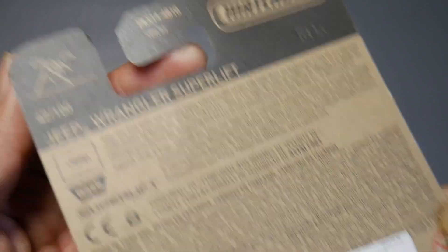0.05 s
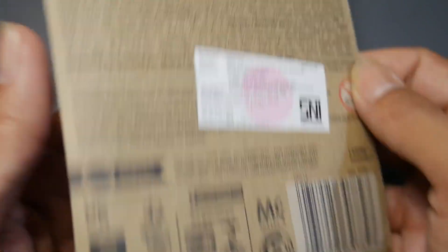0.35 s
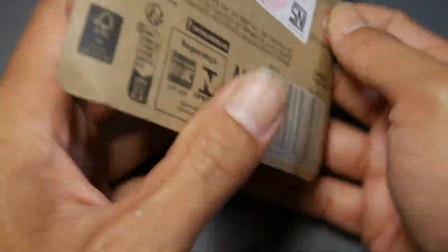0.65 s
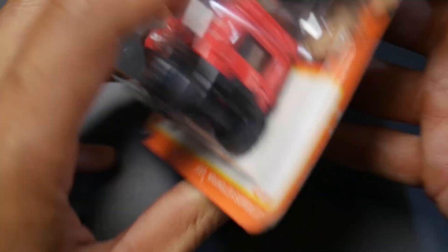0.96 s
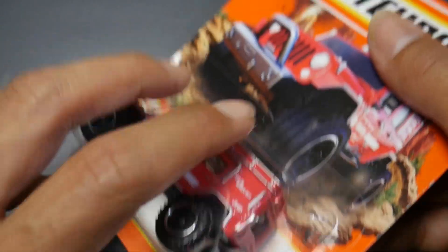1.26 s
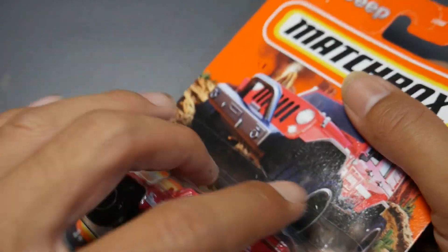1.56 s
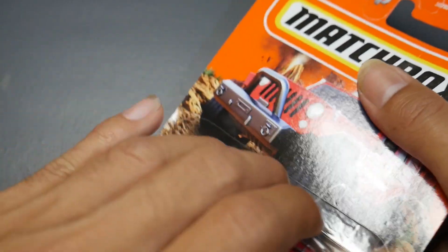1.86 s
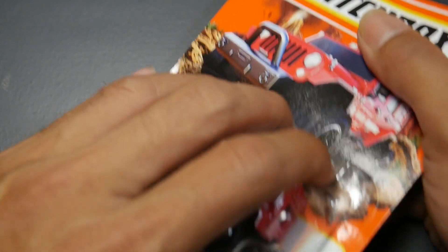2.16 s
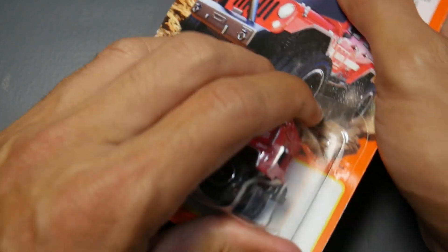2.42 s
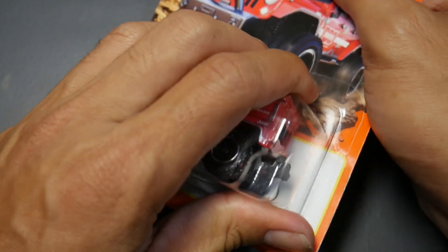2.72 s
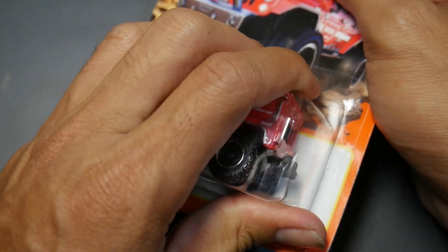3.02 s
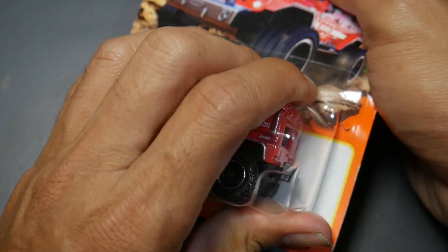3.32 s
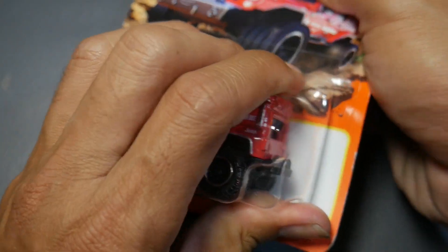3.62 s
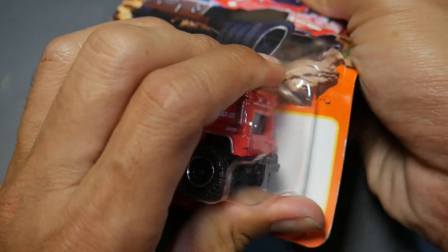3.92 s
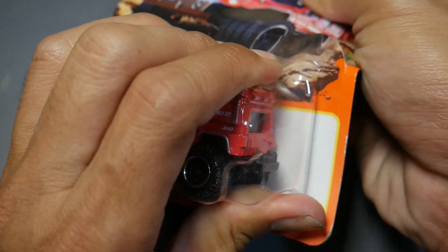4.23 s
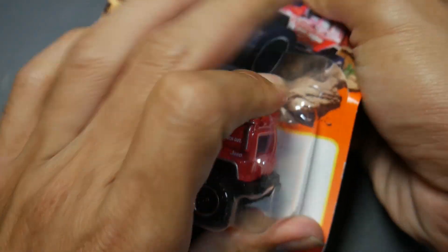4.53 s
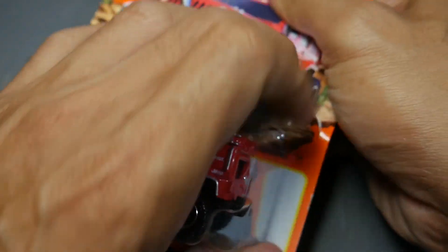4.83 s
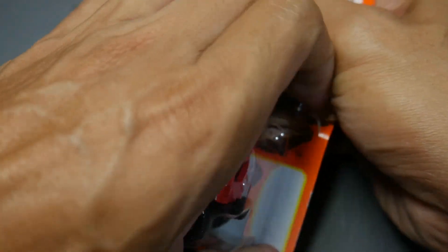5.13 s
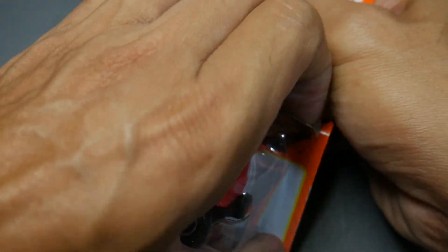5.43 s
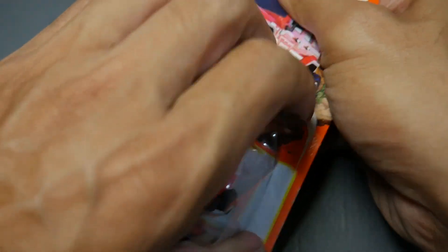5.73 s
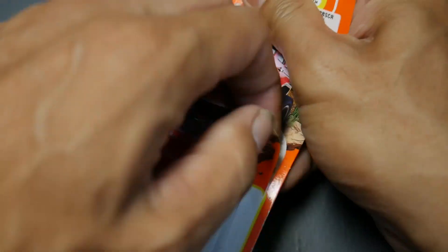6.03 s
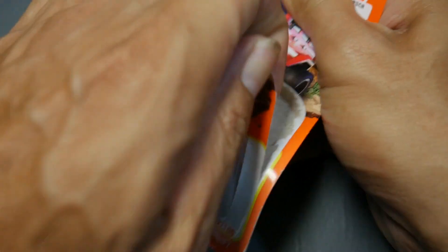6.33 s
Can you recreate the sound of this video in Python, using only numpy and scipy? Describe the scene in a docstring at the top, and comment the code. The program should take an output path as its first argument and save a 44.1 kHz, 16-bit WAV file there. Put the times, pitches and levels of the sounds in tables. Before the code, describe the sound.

A fan hums steadily in a small room. Close to the microphone and slightly left, hands turn over a carded plastic blister pack, with light clicks, rubbing and dull card thuds around 0.6 to 0.9 seconds. Fingers slide over it from 1 to 2.5 seconds, with small crinkles and a brief squeak near 1.4. After a quieter moment, the glued seam creaks and the thin plastic ticks from about 3.3 to 4.3 seconds, with soft bumps near 4. The bubble gives a hollow pop at 4.6, followed by an airy swish of card and, at 5 seconds, a sharp crack, the loudest sound. From 5.3 the cardboard starts peeling in louder, rasping tears, with plastic snaps near 5.5, 5.7, 5.9 and 6.3, and a last scraping tear until about 6.5 seconds. Each sound has a short room echo.

```python
"""A small room with a fan humming, the camera's microphone close to a pair of hands, a little left of centre.
They turn over a carded blister pack, pick at its edge and start to peel the card off the bubble.
Fingers rub and squeak on card and plastic, the thin shell ticks and buckles with sharp snaps,
the card thuds and swishes, and glued fibres creak and tear. Desk and walls answer each sound."""
import sys
import numpy as np
from scipy import signal
from scipy.fft import rfft, irfft, next_fast_len
from scipy.io import wavfile
from scipy.ndimage import uniform_filter1d, minimum_filter1d, map_coordinates

SR = 44100
rng = np.random.default_rng(int(sys.argv[2]) if len(sys.argv) > 2 else 0)


def unload_wav(signal):
    """Save mono or channel-first audio to the path in sys.argv[1] as 16-bit WAV at rate SR, clipped to [-1, 1]."""
    wavfile.write(
        sys.argv[1],
        SR,
        np.round(np.clip(np.atleast_2d(signal).T, -1, 1) * 32767).astype(np.int16),
    )


N = 285327

# The fan's rush of air: frequency_hz, density_db
FAN_AIR_SPECTRUM = [(15, -70), (25, -30), (164, -8), (281, -4), (340, -6), (389, -5), (871, -11.5),
                    (945, -11.5), (1020, -15.5), (1380, -16), (1660, -20.5), (2360, -32), (2850, -25),
                    (6920, -36), (15500, -42)]
# Its motor's harmonics: pitch_hz, level_db
MOTOR_HUM = [(333.8, -55.5), (667.5, -66.5), (1001, -66.5)]
# Its narrow whistles: pitch_hz, width_hz, level_db
FAN_WHISTLES = [(2253, 4.6, -70.5), (2340, 290, -63), (2377, 3.9, -68.5)]
# A finger slides over the pack or peels the card: start_s, fastest_s, end_s, rub_gain_db, hiss_gain_db
STROKES = [(-0.02, 0.234, 0.4, -58.5, -60.5), (0.615, 0.737, 0.92, -48.5, -58),
           (0.998, 1.028, 1.09, -52.5, -60), (1.126, 1.214, 1.26, -51.5, -60.5),
           (1.236, 1.32, 1.48, -46, -61), (1.49, 1.532, 1.69, -52.5, -67), (1.594, 1.81, 2.4, -62, -69.5),
           (1.9, 2.195, 2.22, -50, -56), (2.12, 2.276, 2.56, -50.5, -62.5), (2.674, 2.837, 3.09, -55, -86),
           (3.318, 3.37, 3.42, -52, -68), (3.45, 3.59, 3.95, -53.5, -73), (3.762, 3.904, 3.9, -58, -62.5),
           (3.926, 4.03, 4.24, -50.5, -51), (4.396, 4.501, 4.57, -46, -55.5),
           (4.575, 4.658, 4.82, -43.5, -56.5), (4.733, 4.898, 5.1, -51, -52), (5.204, 5.32, 5.42, -46, -51),
           (5.459, 5.5, 5.57, -50, -42.5), (5.497, 5.683, 5.78, -39.5, -41), (5.674, 5.75, 5.81, -39, -56),
           (5.808, 5.9, 6.12, -40.5, -52.5), (6.0, 6.108, 6.7, -46, -57), (6.187, 6.397, 6.45, -47, -39.5),
           (6.345, 6.47, 6.5, -35.5, -54)]
# The pack's body under rubbing skin: frequency_hz, density_db
RUB_SPECTRUM = [(60, -47), (150, -4), (300, -23), (550, 7), (770, 7.5), (950, 2.5), (1250, 5), (1600, 3),
                (2300, -2), (2900, -6.5), (4500, -10.5), (8000, -39)]
# Card fibres scraped and torn: frequency_hz, density_db
FIBRE_SPECTRUM = [(1500, 2), (3000, 3.5), (3800, 1), (5200, 3.5), (6500, 4.5), (8000, -1.5), (9800, 1),
                  (12000, -6.5), (15500, -15)]
# The plastic shell's resonances: pitch_hz, gain_db, t60_s
SHELL_MODES = [(1100, 13, 0.0085), (1311, 0.5, 0.032), (1330, -4, 0.0058), (1680, -7.5, 0.015),
               (1938, -4, 0.027), (2102, 0, 0.018), (2376, -5.5, 0.026), (2710, -5, 0.014),
               (3650, 1.5, 0.0077)]
# The bubble buckles or a nail slips off its edge:
# start_s, panel_pitch_hz, panel_level_db, crease_pitch_hz, shell_gain_db, crack_gain_db, slip_length_s
SNAPS = [(0.1371, 730, -50, 1580, -60, -64, .001), (0.2156, 646, -46.5, 1290, -53.5, -62, 0.0028),
         (0.5719, 637, -39, 1620, -42.5, -53.5, .0012), (0.654, 650, -38.5, 2360, -44, -51, .0032),
         (0.67, 530, -50, 1860, -51, -60, .001), (0.7162, 623, -30, 1870, -43, -40, .006),
         (0.789, 620, -36.5, 2100, -39, -48.5, 0.005), (0.928, 710, -47, 1260, -51, -58, .001),
         (1.0454, 610, -49, 2500, -41.5, -50.5, .001), (1.189, 770, -52, 1820, -53, -55, .001),
         (1.214, 720, -51, 2430, -49, -64, .001), (1.5285, 780, -44.5, 1260, -48, -53, 0.0021),
         (1.9868, 790, -47, 1270, -51, -61, .0056), (2.091, 810, -47, 1370, -44, -53.5, 0.0012),
         (2.1712, 587, -44.5, 2130, -41.5, -53, .001), (2.261, 830, -47.5, 1500, -48, -54.5, .0072),
         (3.5587, 394, -49, 1390, -48.5, -57, .001), (3.5913, 890, -53, 1380, -45, -54, .001),
         (3.6156, 680, -48, 1480, -42.5, -50.5, .001), (3.6409, 930, -51, 1330, -46, -49, .001),
         (3.864, 905, -50, 1230, -51.5, -61, 0.0027), (3.957, 840, -46, 1900, -50, -46, .0045),
         (4.013, 380, -50, 3070, -49, -44.5, .001), (4.0584, 920, -54, 1260, -40.5, -47, .001),
         (4.1549, 910, -51, 1100, -51.5, -71, .0016), (4.2565, 904, -45.5, 1120, -49.5, -55, .001),
         (4.6015, 538, -18.5, 1420, -36, -53, 0.00074), (4.6656, 458, -40.5, 1240, -42, -48, .001),
         (4.7152, 670, -46, 1320, -46, -50.5, .001), (5.0431, 758, -20, 1422, -13, -16, 0.00247),
         (5.281, 820, -45, 1600, -43, -49, 0.0052), (5.3033, 412, -43, 1340, -42.5, -62, .0056),
         (5.3279, 480, -35, 1270, -43, -49.5, .001), (5.4675, 774, -35.5, 1730, -32.5, -33.5, .0055),
         (5.478, 643, -30.5, 1400, -31, -37.5, 0.005), (5.7081, 790, -32.5, 1690, -28.5, -48, .0062),
         (5.732, 644, -26, 1670, -21, -27.5, .001), (5.7866, 714, -35.5, 1810, -58, -64, .001),
         (5.9192, 720, -61, 1380, -38, -60, .001), (5.9291, 730, -20, 1160, -39, -53, .001),
         (5.9882, 720, -33.5, 1570, -37, -49, 0.00199), (5.9951, 755, -52, 1540, -37.5, -45, .007),
         (6.334, 786, -32.5, 1490, -27, -57, .001)]
# The crack at a crease: frequency_hz, density_db
CRACK_SPECTRUM = [(300, -48), (1500, -39), (2500, 5), (3000, 2.5), (3750, 2.5), (4400, -1.5), (5500, -1.5),
                  (7000, -4), (8000, -10), (9600, -12), (11500, -18), (15500, -38)]
# The card is bumped and flexes in the hands: start_s, gain_db
BUMPS = [(0.216, -44), (0.575, -47), (0.718, -38), (0.792, -30), (0.831, -37), (3.972, -33.5),
         (4.06, -33.5), (4.137, -48), (6.103, -38)]
# Runs of ticks from the glued seam: start_s, tick_count, first_level_db, tilt_db_per_octave
CREAKS = [(0.856, 3, -49, -8.5), (1.964, 1, -52.5, -3.5), (2.979, 1, -56, -11), (3.217, 1, -50.5, -9),
          (3.327, 7, -52.5, -5), (3.498, 3, -57, -5.5), (4.129, 1, -48, 1), (4.197, 2, -53, 1),
          (4.293, 2, -52.5, 1.5), (4.838, 1, -50.5, 8), (5.287, 1, -46.5, 3), (5.398, 1, -49.5, -3.5),
          (5.479, 1, -38, -5), (5.524, 2, -45, 9), (5.651, 2, -41.5, 5)]
# Narrow fingertip squeaks and rasps, and one broad, airy swish of a sliding card edge:
# start_s, end_s, first_centre_hz, last_centre_hz, width_hz, level_db
FRICTION_BANDS = [(1.287, 1.341, 823, 770, 170, -46), (1.355, 1.411, 851, 1017, 260, -41.5),
                  (1.342, 1.417, 4090, 3640, 700, -56), (1.344, 1.404, 5840, 5550, 500, -61),
                  (1.342, 1.418, 7530, 7160, 900, -64), (2.789, 2.914, 784, 768, 400, -52),
                  (3.96, 4.085, 3920, 3090, 800, -51.5), (4.112, 4.237, 5160, 4600, 900, -61),
                  (4.444, 4.549, 1050, 1169, 500, -46.5), (4.767, 5.05, 10240, 10040, 4580, -57),
                  (5.459, 5.578, 6300, 6120, 900, -52), (5.829, 5.93, 627.2, 756, 220, -48),
                  (6.395, 6.447, 717, 800, 129, -43)]
# The room's decay: frequency_hz, t60_s
ROOM_DECAY = [(150, 0.67), (500, 0.29), (1400, 0.47), (4000, 0.39), (9000, 0.45), (15000, 0.62)]
# Nearby things that ring along: pitch_hz, gain_db, t60_s
NEARBY_RINGS = [(770, -33, 0.13), (1156, -26.5, 0.26), (2820, -48, 0.27)]
# How alike left and right are at the microphone, for fan, pack and room: frequency_hz, correlation
FAN_LIKENESS = [(30, 0.1), (120, 0.44), (330, 0.56), (1000, 0.63), (3000, 0.68), (10000, 0.23)]
PACK_LIKENESS = [(200, 0.85), (1500, 0.85), (5000, 0.88), (12000, 0.65)]
ROOM_LIKENESS = [(200, 0.86), (1200, 0.74), (4000, 0.71), (10000, 0.76)]


def amp(db):
    """Decibels to gain."""
    return 10 ** (np.asarray(db) / 20)


def unit(x):
    """x at rms 1."""
    return x / np.sqrt(np.mean(x ** 2) + 1e-20)


def unit_attack(x):
    """A short sound at rms 1 over its first 10 ms."""
    return x / np.sqrt(np.mean(x[..., :SR // 100] ** 2) + 1e-20)


def along(points, hz):
    """Read (frequency_hz, value) points on a log frequency axis."""
    frequencies, values = np.transpose(points)
    return np.interp(np.log(hz + 1), np.log(frequencies + 1), values)


def fade(t, t60_s):
    """Exponential decay, 60 dB down at t60_s."""
    return np.exp(-np.log(1000) * t / t60_s)


def rise(t, time_s):
    """Exponential onset from 0 towards 1."""
    return 1 - np.exp(-t / time_s)


def wobble(rate_hz):
    """A smooth random curve with rate_hz knots a second."""
    knots = rng.standard_normal(int(N * rate_hz / SR) + 4)
    return map_coordinates(knots, [np.arange(N) * rate_hz / SR])


def noise(samples):
    """Two unrelated channels of white noise."""
    return rng.standard_normal((2, samples))


def filtered(x, response):
    """x shaped by a gain that depends on frequency."""
    n = x.shape[-1]
    padded = next_fast_len(n + 4096)
    return irfft(rfft(x, padded) * response(np.fft.rfftfreq(padded, 1 / SR)), padded)[..., :n]


def coloured(x, spectrum):
    """x shaped by (frequency_hz, density_db) points, at rms 1."""
    return unit(filtered(x, lambda hz: amp(along(spectrum, hz))))


def stereo(pair, likeness):
    """Two unrelated signals become left and right of a given likeness."""
    angle = lambda hz: np.arccos(np.clip(along(likeness, hz), -1, 1)) / 2
    mid, side = filtered(pair, lambda hz: np.array([np.cos(angle(hz)), np.sin(angle(hz))]))
    return np.array([mid + side, mid - side])


def radiated(x, corner_hz):
    """A small surface radiates little below its corner frequency."""
    return signal.sosfilt(signal.butter(2, corner_hz, "highpass", fs=SR, output="sos"), x)


def add(track, start_s, sound):
    """Mix a sound into the track at start_s."""
    part = track[..., max(round(start_s * SR), 0):][..., :sound.shape[-1]]
    part += sound[..., :part.shape[-1]]


def fan(air_db=-53.5):
    """Behind the hands, a fan: steady air noise, a few narrow whistles and the motor's wavering hum."""
    t = np.arange(N) / SR
    air = amp(air_db) * coloured(noise(N), FAN_AIR_SPECTRUM)
    for pitch_hz, width_hz, db in FAN_WHISTLES:
        resonance = lambda hz: 1 / (1 + (2 * (hz - pitch_hz) / width_hz) ** 2)
        air += amp(db) * unit(filtered(noise(N), resonance))
    hum = sum(amp(db + wobble(3.46)) * np.sin(2 * np.pi * hz * t + 0.2 * wobble(6.38))
              for hz, db in MOTOR_HUM)
    return stereo(air, FAN_LIKENESS) + hum


def stroke_gains(grip_rub_db=-66, grip_hiss_db=-77):
    """Rub and hiss grow as each stroke speeds up; between strokes the grip never quite rests."""
    t = np.arange(N) / SR
    rub_power, hiss_power = np.full(N, amp(grip_rub_db) ** 2), np.full(N, amp(grip_hiss_db) ** 2)
    for start_s, fastest_s, end_s, rub_db, hiss_db in STROKES:
        moving = (t > start_s) & (t < end_s)
        speed = np.interp(t[moving], np.sort([start_s, fastest_s, end_s]), [0, 1, 0])
        rub_power[moving] += (amp(rub_db) * speed ** 0.88) ** 2
        hiss_power[moving] += (amp(hiss_db) * speed ** 0.98) ** 2
    return np.sqrt(rub_power), np.sqrt(hiss_power)


def friction(spectrum, slips_per_s, spread_db, rasp):
    """Tiny stick-slip releases of uneven size over a smooth rasp, at rms 1."""
    sizes = amp(spread_db * np.minimum(rng.exponential(size=N), 4))
    grains = unit((rng.random(N) < slips_per_s / SR) * sizes * noise(N))
    return unit(stereo(coloured(grains + rasp * noise(N), spectrum), PACK_LIKENESS))


def sliding(rub_gain, hiss_gain):
    """Skin rubs the pack and sounds its body; card fibres hiss as they are scraped and torn."""
    judder_db = 2.0 * wobble(55)  # the fingers catch and let go
    body = friction(RUB_SPECTRUM, slips_per_s=700, spread_db=2.0, rasp=0.97)
    tufts_db = -0.1 * wobble(170)  # the fibres part in small tufts
    fibres = friction(FIBRE_SPECTRUM, slips_per_s=3000, spread_db=3.1, rasp=0.6)
    return rub_gain * amp(judder_db - 1.5) * body + hiss_gain * amp(0.53 * judder_db + tufts_db) * fibres


def crinkles(rub_gain, flips_per_s=16, gain_db=-1.5, spread_db=3, mode_spread_db=6.5):
    """Small creases flip at random and ring the shell, as strongly as the finger rubs."""
    out, t = np.zeros(N), np.arange(SR // 20) / SR
    hz, db, t60_s = np.transpose(SHELL_MODES)[:, :, None]
    for k in range(int(flips_per_s * N / SR)):
        at = min(int((k + rng.random()) * SR / flips_per_s), N - 1)
        mode_gains = amp(db + mode_spread_db * rng.standard_normal(db.shape))
        ring = np.sum(mode_gains * np.sin(2 * np.pi * hz * t) * fade(t, t60_s), axis=0)
        strength = rub_gain[at] * amp(gain_db + spread_db * rng.uniform(-1.2, 1))
        add(out, at / SR, strength * unit_attack(ring))
    return radiated(out, corner_hz=696)


def tilted_fibres(db_per_octave):
    """The fibres' spectrum, brightened or dulled about 4 kHz."""
    return [(hz, db + db_per_octave * np.log2(hz / 4000)) for hz, db in FIBRE_SPECTRUM]


def fibre_pops(hiss_gain, pops_per_s=110, gain_db=-5, spread_db=5.0):
    """Single stronger fibres snap at random, as loud as the tear is fast."""
    t = np.arange(SR // 80) / SR
    breaks = (rng.random(N) < pops_per_s / SR) * amp(gain_db - spread_db * rng.exponential(size=N))
    bursts = signal.oaconvolve(breaks, unit_attack(fade(t, t60_s=0.012)))[:N]
    bright_hiss = coloured(noise(N), tilted_fibres(db_per_octave=2.0))
    return hiss_gain * bursts * stereo(bright_hiss, PACK_LIKENESS)


def rocking_panel(t, pitch_hz):
    """A panel of the bubble rocks in its two lowest modes, damped by the fingers."""
    modes = np.cos(2 * np.pi * pitch_hz * t) + 0.35 * np.cos(2 * np.pi * 0.794 * pitch_hz * t)
    damped = modes * fade(t, t60_s=0.017) * rise(t, 0.0019)
    return unit_attack(radiated(damped, corner_hz=0.25 * pitch_hz))


def crease_flip(t, pitch_hz, ring_db=-3):
    """A crease flips in about two cycles and rings the shell, most within an octave of its pitch."""
    flip = np.sin(2 * np.pi * pitch_hz * t) * t * fade(t, t60_s=0.0022)
    flip = radiated(flip, corner_hz=0.61 * pitch_hz)
    ring = np.zeros(len(t))
    for hz, db, t60_s in SHELL_MODES:
        strength = amp(db + rng.normal(0, 1)) / (1 + np.log2(hz / pitch_hz) ** 2)
        ring += strength * np.sin(2 * np.pi * hz * t + rng.normal(0, 0.5)) * fade(t, t60_s)
    ring = radiated(ring * rise(t, 0.0005), corner_hz=700)
    return unit_attack(unit_attack(flip) + amp(ring_db) * unit_attack(ring))


def catches(t, slip_s, gap_s=0.0014, size=0.65):
    """One release, then a catch roughly every gap_s while the slip lasts."""
    count = int(slip_s / gap_s)
    kicks = signal.unit_impulse(len(t))
    catch_s = (np.arange(count) + rng.uniform(0.6, 1.16, count)) * slip_s / max(count, 1)
    kicks[(catch_s * SR).astype(int)] += size * rng.choice([-1, 1], count)
    return kicks / np.linalg.norm(kicks)


def crack(t, t60_s, spectrum):
    """A bright burst of splitting fibres or creasing plastic."""
    burst = stereo(coloured(noise(len(t)), spectrum), PACK_LIKENESS)
    return unit_attack(burst * fade(t, t60_s) * rise(t, 0.000095))


def snaps():
    """A crease cracks, rings the shell and rocks a panel, towards the microphone and the walls."""
    to_mic, to_walls, t = np.zeros((2, N)), np.zeros(N), np.arange(SR // 16) / SR
    even_crack = unit_attack(coloured(signal.unit_impulse(len(t), SR // 1000), CRACK_SPECTRUM))
    for start_s, panel_hz, panel_db, crease_hz, shell_db, crack_db, slip_s in SNAPS:
        panel = amp(panel_db) * rocking_panel(t, panel_hz)
        shell = amp(shell_db + 1.86) * crease_flip(t, crease_hz)
        catching_shell = signal.fftconvolve(shell, catches(t, slip_s))[:len(t)]
        crack_gain = amp(crack_db - 0.1)
        close_crack = crack(t, 0.023 + 2 * slip_s, CRACK_SPECTRUM)
        add(to_mic, start_s, panel + catching_shell + crack_gain * close_crack)
        # summed over all directions, the catches blend and the crack's spectrum evens out
        add(to_walls, start_s, panel + shell + crack_gain * even_crack)
    return to_mic, to_walls


def card_bumps(gain_db=-6):
    """The stiff card gives a dull, low flutter when it is bumped."""
    out, t = np.zeros((2, N)), np.arange(SR // 4) / SR
    envelope = fade(t, t60_s=0.13) * rise(t, 0.0033)
    for start_s, db in BUMPS:
        thud = coloured(noise(len(t)), [(40, -31), (85, -2), (140, 2), (240, 3.5), (380, -3), (900, -34)])
        add(out, start_s, amp(db + gain_db) * stereo(thud, PACK_LIKENESS) * envelope)
    return out


def seam_creaks(gap_s=0.013, drop_db_per_tick=0.7, t60_s=0.023):
    """Glued fibres part in quick, weakening runs of ticks without moving the bubble."""
    out, t = np.zeros((2, N)), np.arange(SR // 20) / SR
    for start_s, count, first_db, tilt in CREAKS:
        spectrum = [(100, -40)] + tilted_fibres(tilt)
        for k in range(count):
            jitter = min(k, 1) * rng.normal(0, 0.08)
            tick = amp(first_db - drop_db_per_tick * k) * crack(t, t60_s, spectrum)
            add(out, start_s + gap_s * (k + jitter), tick)
    return out


def squeaks_and_swish():
    """Friction sounds in gliding bands: narrow fingertip squeaks and rasps, one airy swish of card."""
    out = np.zeros((2, N))
    for start_s, end_s, first_hz, last_hz, width_hz, db in FRICTION_BANDS:
        progress = np.linspace(0, 1, int((end_s - start_s) * SR))
        chatter = filtered(noise(SR // 2), lambda hz: 1 / (1 + (2 * hz / width_hz) ** 4))
        chatter = chatter[:, :len(progress)]
        phase = 2 * np.pi * np.cumsum(first_hz + (last_hz - first_hz) * progress) / SR
        band = unit(chatter[0] * np.cos(phase) + chatter[1] * np.sin(phase))
        add(out, start_s, amp(db) * np.sin(np.pi * progress) * band)
    return out


def room(x, tail_db=-6, delay_s=0.005):
    """The desk and walls answer after a few milliseconds, and nearby things ring along."""
    hz, frame_s, bands = signal.stft(noise(SR // 2), SR, nperseg=256)
    decay = fade(frame_s, along(ROOM_DECAY, hz)[:, None])
    tail = stereo(signal.istft(bands * decay, SR, nperseg=256)[1], ROOM_LIKENESS)
    tail *= amp(tail_db) / np.sqrt(np.sum(tail ** 2) / 2)
    t = np.arange(tail.shape[1]) / SR
    for pitch_hz, db, t60_s in NEARBY_RINGS:
        tail += amp(db) * np.sin(2 * np.pi * pitch_hz * t) * fade(t, t60_s) / np.sqrt(SR / 100)
    delayed = np.pad(x.mean(axis=0), (int(delay_s * SR), 0))
    return signal.fftconvolve(delayed[None], tail, axes=1)[:, :N]


def scene():
    """The pack close to the microphone, room and fan behind it, all leaning a little left."""
    rub_gain, hiss_gain = stroke_gains()
    close_snaps, snaps_to_walls = snaps()
    handling = seam_creaks() + card_bumps() + sliding(rub_gain, hiss_gain) + squeaks_and_swish()
    handling = radiated(handling + crinkles(rub_gain) + fibre_pops(hiss_gain), corner_hz=60)
    balance = amp([[0.45], [-0.45]])
    return (close_snaps + handling + room(snaps_to_walls + handling) + fan()) * balance


def record(dry):
    """The camera's fast limiter holds peaks at full scale; its band ends steeply at 15.7 kHz."""
    needed_gain = 1 / np.maximum(np.abs(dry).max(axis=0), 1)
    gain = uniform_filter1d(minimum_filter1d(needed_gain, size=67), size=67)  # 1.5 ms windows
    return filtered(dry * gain, lambda hz: 1 / (1 + (hz / 15700) ** 120))


dry = scene()
out = record(dry)
unload_wav(out)
```